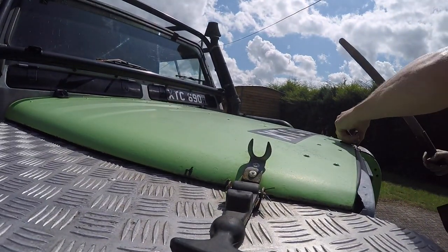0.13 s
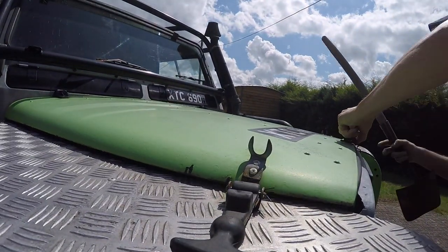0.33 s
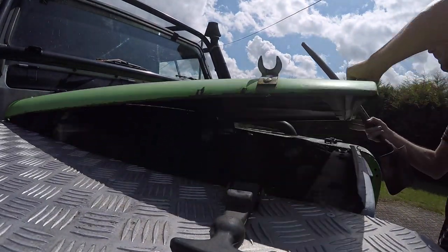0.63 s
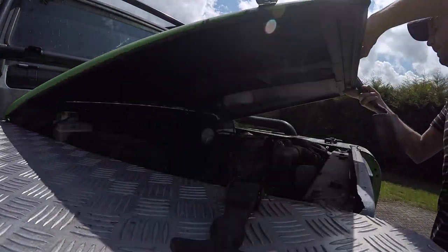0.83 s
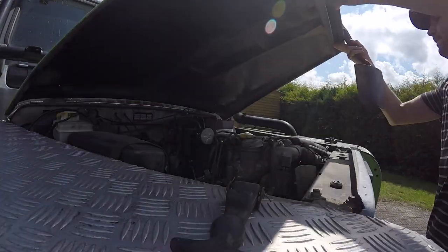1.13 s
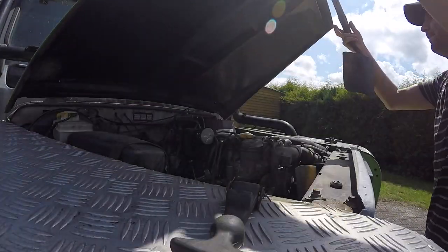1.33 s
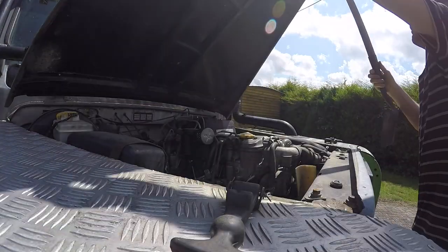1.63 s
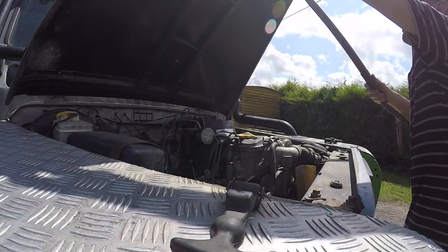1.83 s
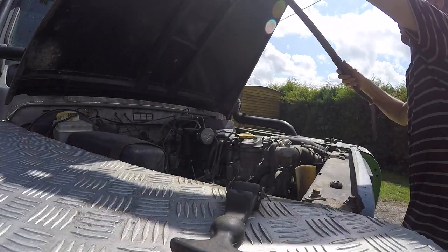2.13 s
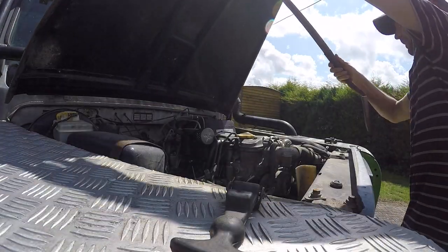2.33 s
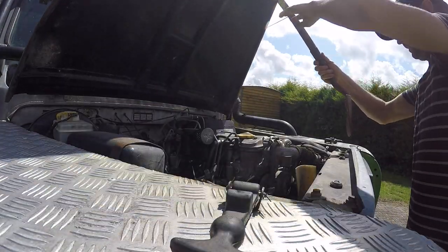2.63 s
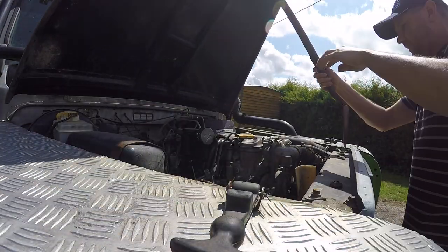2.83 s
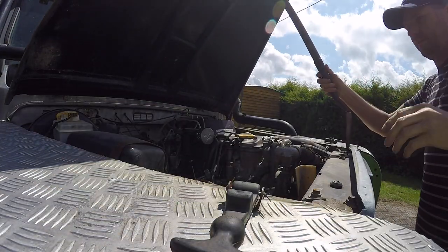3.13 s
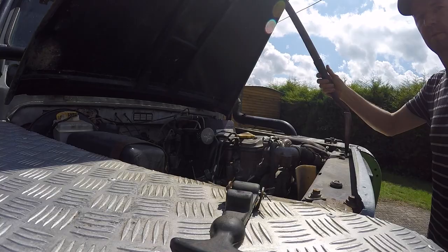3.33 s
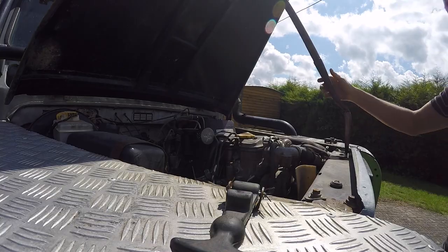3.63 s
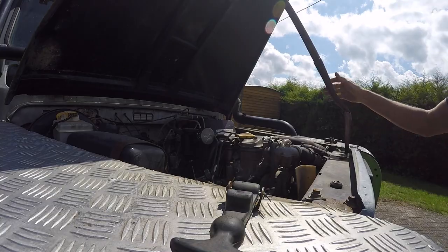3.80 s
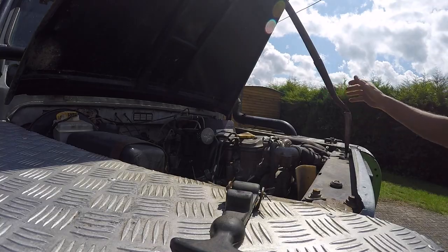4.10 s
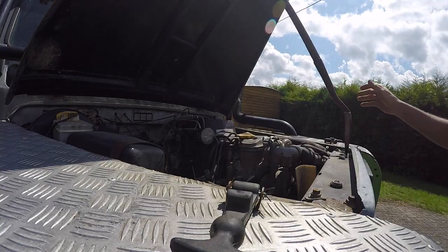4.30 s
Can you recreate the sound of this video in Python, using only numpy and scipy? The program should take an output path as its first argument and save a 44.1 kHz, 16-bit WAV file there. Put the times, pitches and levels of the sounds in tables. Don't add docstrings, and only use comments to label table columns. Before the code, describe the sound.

A metal car bonnet is unlatched with quick clicks, lifted with a thud and hard clank, then propped on a bar, under buffeting wind rumble.

```python
import sys
import numpy as np
from scipy import signal
from scipy.io import wavfile
from scipy.ndimage import uniform_filter1d

SR = 44100
rng = np.random.default_rng(int(sys.argv[2]) if len(sys.argv) > 2 else 0)


def voltage_ratio(decibels):
    exponent = np.asarray(decibels, float) / 20
    return 10 ** exponent


def master(y):
    cut = np.clip(np.atleast_2d(y).T, -1, 1)
    pcm = np.round(cut * 32767)
    wavfile.write(sys.argv[1], SR, pcm.astype(np.int16))


N = 196641


def band(x, lo_hz, hi_hz, order=2):
    edges = [lo_hz, min(hi_hz, .45 * SR)]
    return signal.sosfilt(signal.butter(order, edges, "bandpass", fs=SR, output="sos"), x)


def unit(x):
    return x / np.sqrt(np.mean(x ** 2))


def walk(rate_hz):
    hold = int(SR / rate_hz)
    steps = np.repeat(rng.standard_normal(N // hold + 1), hold)
    return 0.87 * uniform_filter1d(uniform_filter1d(steps, hold), hold)[:N]


def curves(table):
    s, *columns = np.transpose(table)
    return [np.interp(np.arange(N) / SR, s, column) for column in columns]


# t/s, level/dB
RUSTLE = [(0.0, -54), (0.55, -56.5), (0.86, -59), (1.18, -61), (1.33, -59.5), (1.5, -61), (2.13, -62.5),
          (2.33, -57.5), (2.51, -61.5), (2.77, -64), (3.17, -60), (3.33, -62), (4.11, -61.5), (4.46, -56.5)]


def rustle():
    return curves(RUSTLE)[0]


# t/s, gust level/dB, fine turbulence level/dB
GUSTS = [(0.0, -39.5, 3.5), (0.12, -35, 4), (0.27, -30, 0.5), (0.43, -24.5, -6.5), (0.58, -35, 2.5),
         (0.86, -32, 2), (1.19, -27.5, -5.7), (1.35, -27.5, -1.5), (1.51, -38, 5.2), (1.76, -30.5, -3.8),
         (2.07, -24, -2.2), (2.76, -24, 7.3), (2.98, -27.5, -7), (3.5, -31, 1.2), (3.89, -30, -0.9),
         (4.1, -30.5, 4), (4.31, -46.5, 8), (4.46, -21, -15.3)]


def gusts():
    return curves(GUSTS)


# f/Hz, level/dB per Hz
HISS = [(74, -31), (125, 2.5), (224, -0.5), (253, -5), (298, -7.5), (473, -22), (579, -32.5), (978, -23.5),
        (1100, -31.5), (4350, -41.5), (14000, -53), (15500, -60)]


def outdoor_hiss(gust_db, fine_db, rustle_db):
    edge_db = -45 + 0.6 * (gust_db + fine_db + 30.5) + 0.3 * (rustle_db + 61)
    top_db = -66 + 0.6 * (rustle_db + 59.5)
    f, density_db = np.transpose(HISS)
    groups = np.zeros((3, N))
    for hz in 130 * 2 ** np.arange(0, 7, .5):
        db = np.interp(np.log(hz), np.log(f), density_db) + 10 * np.log10(hz)
        flicker_db = (1.0 + 300 / hz) * walk(9.9)
        noise = unit(band(rng.standard_normal(N), hz / 2 ** .25, hz * 2 ** .25))
        groups[int(hz > 450) + int(hz > 2500)] += voltage_ratio(db + flicker_db) * noise
    edge, middle, top = [unit(group) for group in groups]
    return edge * voltage_ratio(edge_db) + middle * voltage_ratio(rustle_db) + top * voltage_ratio(top_db)


def wind_rumble(gust_db, fine_db):
    lumps = walk(22)
    deep_db = gust_db - 0.5 + 2.2 * lumps
    low_db = gust_db + fine_db - 4.5 + 1.0 * lumps + 0.56 * walk(40)
    deep = band(rng.standard_normal(N) * voltage_ratio(deep_db), 21, 55, order=2)
    low = band(rng.standard_normal(N) * voltage_ratio(low_db), 51, 97, order=3)
    return voltage_ratio(29.0) * deep + voltage_ratio(24.5) * low


# t/s, peak level/dB, f/Hz
EDDIES = [(0.347, -10, 42), (0.403, -8, 38.3), (0.986, -10, 54.3), (1.266, -17, 56.5), (1.779, -15.5, 61.6),
          (1.898, -14, 32), (1.982, -14, 41), (2.035, -12, 53.7), (2.14, -7, 55), (2.194, -11, 92),
          (2.236, -15.5, 80), (2.282, -25, 36), (2.348, -11, 43), (2.45, -11.5, 39), (2.587, -10.5, 65),
          (2.631, -10, 36.3), (2.75, -10.5, 84.8), (2.825, -8.5, 64.6), (2.88, -3.5, 50),
          (2.924, -17.5, 64.5), (3.071, -12, 50), (3.147, -14.5, 69), (3.203, -14.5, 72.9),
          (3.884, -19, 61.5), (4.006, -14.5, 23.5), (4.127, -7, 49.1), (4.189, -15, 43),
          (4.236, -11.5, 30.2),
          (0.602, -23.5, 75), (.8, -23.5, 95), (1.99, -20, 130.6), (2.349, -15, 90), (2.751, -21, 200),
           (3.38, -19, 83), (3.385, -26, 171), (3.615, -20.5, 70), (3.99, -22, 109.3)]


def eddies():
    length_cycles, roundness = 0.5, 1.2
    s, db, hz = np.transpose(EDDIES)[:, :, None]
    turns = (np.arange(N) / SR - s) * hz
    start = 2 * np.pi * rng.random((len(s), 1))
    swell = np.exp(-np.abs(turns / length_cycles) ** roundness)
    return np.sum(voltage_ratio(db - 1.0) * swell * np.cos(2 * np.pi * turns + start), axis=0)


# middle t/s, length/s, level/dB, centre f/Hz, width/octaves
SCUFFS = [(0.277, 0.081, -67, 3420, 0.97), (1.088, .07, -52, 2200, 2.6), (1.233, .06, -54, 2011, 2.2),
          (1.387, 0.035, -65, 6200, 1.3), (1.534, .05, -60.5, 4290, 1.7), (1.54, 0.077, -65.5, 8900, 1.5),
          (1.734, 0.046, -65, 8020, 0.47), (1.753, 0.065, -64, 3950, 0.83), (3.27, 0.077, -74, 7160, 0.61),
          (3.741, 0.54, -69.5, 2504, 1.1), (4.273, 0.057, -64.5, 2177, 1.1),
          (4.35, 0.072, -64.5, 4900, 0.35)]


def scuffs():
    out, t = 0, np.arange(N) / SR
    rub = rng.standard_normal(N) * voltage_ratio(3.4 * walk(300))
    for s, length, db, hz, octaves in SCUFFS:
        swell = np.exp(-(2 * (t - s) / length) ** 2)
        half_width = 2 ** (octaves / 2)
        out = out + voltage_ratio(db) * swell * unit(band(rub, hz / half_width, hz * half_width))
    return out


def ring(drive, modes, spread):
    out = 0
    for hz, db, t60 in modes:
        for side in (-1, 1):
            r = 1000 ** (-1 / (t60 * SR))
            w = 2 * np.pi * hz * (1 + side * spread / 2) / SR
            out = out + voltage_ratio(db) * np.sin(w) * signal.lfilter([1], [1, -2 * r * np.cos(w), r * r], drive)
    return out


def bursts(times, gains, t60s, rise_s, tail_db, tail_t60, snap_db=-40):
    power, t = np.zeros(N + SR), np.arange(SR // 3) / SR
    tail = voltage_ratio(tail_db) * 1000 ** (-t / tail_t60)
    snap = voltage_ratio(snap_db) * 1000 ** (-t / 0.0078)
    rise = 1 - np.exp(-t / rise_s)
    for s, gain, t60 in zip(times, gains, t60s):
        decay = 1000 ** (-t / max(t60, .01))
        start = int(s * SR)
        power[start:start + len(t)] += (gain * rise * (decay + tail + snap)) ** 2
    return np.sqrt(power[:N])


# f/Hz, level/dB, t60/s
LIFT = [
    [(.748, -24), (.803, -29.5), (.848, -34), (.90, -36.5), (.945, -38)],
    [(226, -6, .4), (243, 1, 0.44), (297.7, -1, 0.32), (322.7, -2, 0.32), (388, -6, .3), (418, -10, 0.23)],
]
TAP = [
    [(2.147, -20)],
    [(234.5, -4.5, 0.43), (307.4, -2, 0.18), (470, -15, 0.2), (610, -0.5, 0.15)],
]
PROP = [
    [(2.205, -21.5), (2.222, -19)],
    [(138.8, 4, 0.33), (239, -6, 0.35), (287, -12, 0.43), (313, -16, 0.38)],
]
SEAT = [
    [(3.045, -22.5), (3.070, -17.5)],
    [(140.3, 0.5, .9), (200, -11.5, 0.31), (260.4, -5.5, 0.39), (355, -31, 0.32), (514, -25.5, .15)],
]
BAR = [
    [(3.041, -33), (3.066, -26.5), (3.074, -27)],
    [(852, -17, 0.12), (1351, 3, 0.13), (1405, -2.5, 0.15), (1497, -3, 0.18), (1603, -14, .17), (1057, -11, .15), (2006, 1.5, 0.063), (2270, 2, .09), (2395, 2.5, 0.084), (2416, -2.5, 0.08), (3500, -6, 0.13), (3820, -11, 0.13)],
]
RELEASE = [
    [(.122, -36), (.152, -36), (.19, -39), (.24, -45)],
    [(141.6, 2.5, 0.34), (268, -15, 0.33), (454.6, 0, 0.16), (555, -3, 0.2)],
]


def panel_booms():
    out = 0
    for blows, modes in (LIFT, TAP, PROP, SEAT, BAR, RELEASE):
        s, db = np.transpose(blows)
        scrape = bursts(s, voltage_ratio(db - 29.5), 0.083 + 0 * s, .001, -20.0, 0.24)
        shove = scrape * rng.standard_normal(N)
        shove[(s * SR).astype(int)] += voltage_ratio(db - 4.0)
        push = np.hanning(int(SR / modes[-1][0]) + 3)
        out = out + ring(np.convolve(shove, push / push.sum())[:N], modes, spread=0.0073)
    return out


def colour(blows, hz, thud_db):
    s, db, centre, skirt, t60 = np.transpose(blows)
    octave = np.log2(hz / 1000)
    distance = np.maximum(centre - octave, 1.07 * (octave - centre))
    peak = voltage_ratio(db - skirt * distance)
    thud = voltage_ratio(db + thud_db - 18 * max(octave + 1, 0))
    return np.hypot(peak, thud)


# f/Hz, level/dB
BODY = [(250, -7), (400, 1), (600, 2), (1000, 2.5), (1500, -1.5), (2100, 0), (2900, -2.5), (4000, 1),
        (5600, -1.5), (7800, -2), (10500, -5), (13500, -11)]


def bodywork(blows, thud_db, slope, tail_db, snap_db, crack_db):
    out, grain = 0, voltage_ratio(2.4 * walk(700))
    times, *_, t60 = np.transpose(blows)
    for k, (hz, colour_db) in enumerate(BODY):
        lo = np.sqrt(hz * BODY[k - 1][0]) if k else 200
        hi = np.sqrt(hz * BODY[k + 1][0]) if k < len(BODY) - 1 else 15000
        share = SR / (2 * (hi - lo))
        gains = colour(blows, hz, thud_db) * voltage_ratio(colour_db - 10.0)
        band_t60 = t60 * (2000 / hz) ** slope
        tail_t60 = 0.27 * (2000 / hz) ** 0.17
        env = bursts(times, gains, band_t60, .0001 + .9 / hz, tail_db, tail_t60, snap_db)
        drive = rng.standard_normal(N) * env * grain * np.sqrt(share)
        drive[(times * SR).astype(int) + 6] += gains * voltage_ratio(crack_db) * share
        out = out + band(drive, lo, hi, order=3)
    return out


# t/s, level/dB, peak/octaves above 1 kHz, skirt/dB per octave, t60/s
KNOCKS = [(.7388, -16, -.5, 6.5, 0.045), (.742, -25.5, 1, 21, 0.11), (.7505, -18, -0.82, 9, 0.19),
          (.780, -31, -1.3, 13, 0.15), (.962, -32.5, -0.29, 20, 0.065), (.979, -39, -0.73, 15, .085),
          (1.645, -45.5, 0.57, 4.5, 0.04), (1.7925, -45.5, 0.74, 8, 0.14), (2.1425, -21.5, -0.69, 9, 0.12),
          (2.165, -37.5, -0.057, 11, 0.061), (2.151, -22.5, -1.38, 13, 0.25), (2.2135, -31.5, .7, 6, 0.12),
          (3.0385, -14, 0.13, 6.5, 0.13), (3.048, -17, -1.06, 4, 0.14), (3.056, -25, -.4, 20, .09),
          (3.066, -14, .9, 10, 0.12), (3.0725, -14, 1.2, 8.5, .073), (3.095, -24.5, -1.3, 10.5, 0.19)]


def dull_knocks():
    return bodywork(KNOCKS, -32, .3, -24.5, -17.0, 1.4)


UNLATCH = [(.002, -32, 2.0, 16, 0.096), (.0355, -32.5, 2.67, 23, 0.06), (.0663, -34, 2.95, 9.5, 0.095),
           (.0985, -19.5, 2.43, 10, 0.13), (.1178, -24, 3.8, 2, 0.14), (.1213, -11.5, 2.42, 13.5, .058),
           (.131, -25.5, 2, 28, 0.092), (.1505, -26.5, 2, 8, 0.042), (.208, -41, 1.55, 11, 0.04),
           (.230, -44.5, 1.7, 12, .05), (.285, -50, 2.1, 6, 0.037), (.3335, -52, 5.4, 9, 0.049),
           (.3567, -32, 2.6, 7.5, .05)]
CLANK = [(1.061, -39.5, 0.1, 6.5, 0.15), (1.0785, -39.5, 0.37, 6.5, 0.33),
         (1.1087, -29.5, 2.55, 8.5, 0.054), (1.1329, -6.5, 1.86, 8, 0.046), (1.1341, -3.5, 1.9, 9, 0.044),
         (1.1347, -19.5, 4.3, 7, .015), (1.1402, -17, 1.2, 2, .11), (1.147, -16, 0.67, 3, 0.19),
         (1.1742, -15.5, 1.75, 12, .09), (1.187, -22, 0.53, 4, 0.044), (1.2617, -21.5, 2.0, 11, 0.1),
         (1.269, -30.5, 0.48, 11.5, 0.17)]
TICKS = [
    (2.02, -47, 1.9, 10, .09),
    (2.338, -48, 0.9, 4, .1),
    (2.358, -42.5, 0.5, 2, 0.22),
    (2.3805, -14, 1.65, 8, 0.069),
    (2.392, -25, 0.3, 1.5, 0.14),
    (2.409, -29.5, 1.6, 8, 0.082),
    (3.3744, -53.5, 2, 15, 0.033),
]
CATCH_HZ = [2060, 2196, 3590, 3770, 4230, 5464, 6400, 7200, 7951, 8140, 10160, 10360, 11130, 12100]
# level shut/dB, level while lifted/dB, level at the bar/dB, t60/s
CATCH = [(-24, -9.5, -5.5, 0.1), (-14, -13.5, -26, .09), (-24, -13, -3, .07), (-15, -7.5, -13, 0.065),
         (-21, -7.5, -2.5, 0.045), (-30, -18, -15, 0.22), (-12, -12.5, -34, 0.017), (-27, -16, -8.5, .07),
         (-6, -16, -9, 0.15), (-15, -24.5, -24, .1), (-11, -11.5, -20, 0.086), (-12, -15.5, -9, .08),
         (-26, -11.5, -14.5, 0.057), (-28, -20.5, -19, .08)]
STAGE_S = [.5, 1.8]
STAGE_RING = (.6, 0.94, 0.91)


def catch_blows():
    thud_db = -9.5
    blows = UNLATCH + CLANK + TICKS
    times = np.transpose(blows)[0]
    strike = np.sqrt(colour(blows, 4000, thud_db) * colour(blows, 10000, thud_db))
    scatter = bursts(times, strike * voltage_ratio(-26), 0.03 + 0 * times, .0002, -29.5, 0.2)
    contact = scatter * rng.standard_normal(N)
    stage = np.digitize(np.arange(N) / SR, STAGE_S)
    levels, catch = np.array(CATCH), 0
    for k in range(3):
        modes = np.column_stack([CATCH_HZ, levels[:, k], levels[:, -1] * STAGE_RING[k]])
        catch = catch + ring(contact * (stage == k), modes, spread=0.0029)
    return bodywork(blows, thud_db, 0.32, -25, 1.5, 1.9) + catch


def scene():
    gust_db, fine_db = gusts()
    hiss = outdoor_hiss(gust_db, fine_db, rustle())
    wind = wind_rumble(gust_db, fine_db) + eddies()
    metal = scuffs() + panel_booms() + dull_knocks() + catch_blows()
    return (hiss + wind + metal)[None]


def band_limit(x):
    return signal.sosfilt(signal.butter(12, 15650, fs=SR, output="sos"), x)


def record(dry):
    rounded = np.clip(np.tanh(dry * .7) / .7, -.9, .9)
    dull = signal.sosfilt(signal.ellip(6, .5, 60, 14700, fs=SR, output="sos"), rounded)
    return band_limit(dull)


dry = scene()
out = record(dry)
master(out)
```